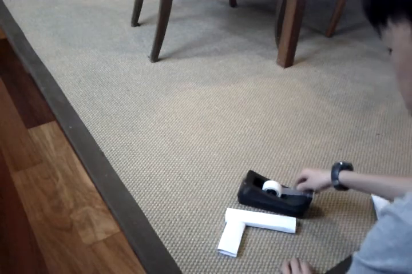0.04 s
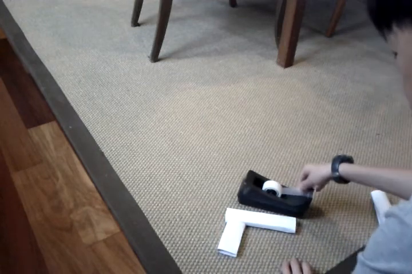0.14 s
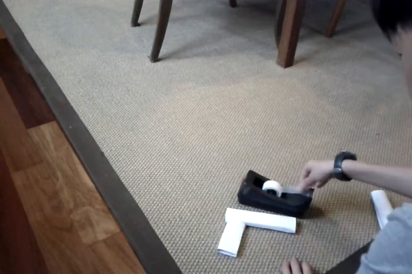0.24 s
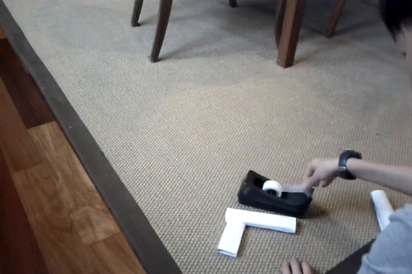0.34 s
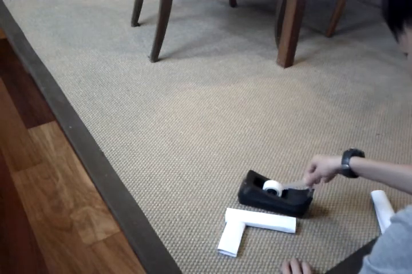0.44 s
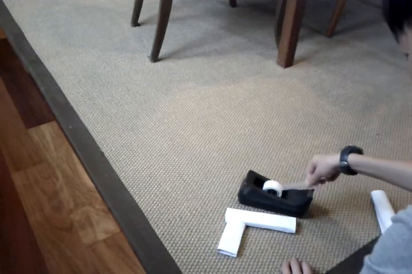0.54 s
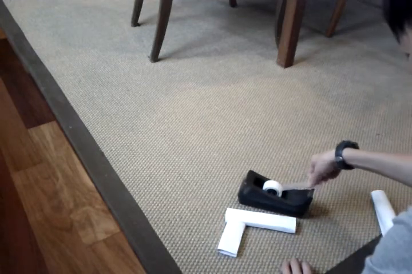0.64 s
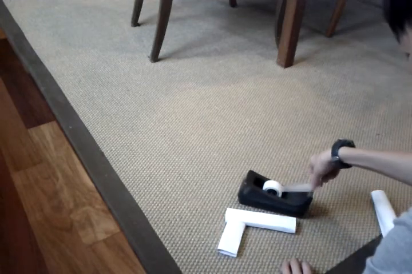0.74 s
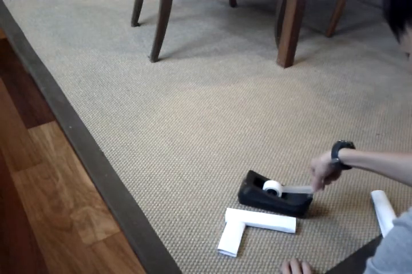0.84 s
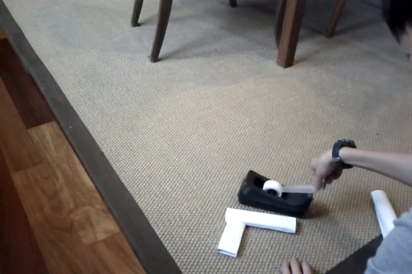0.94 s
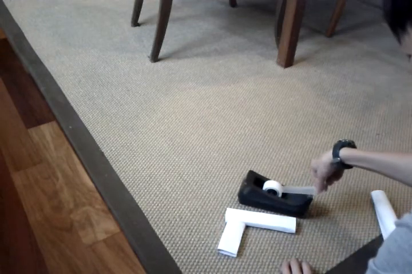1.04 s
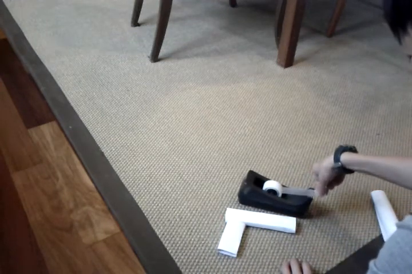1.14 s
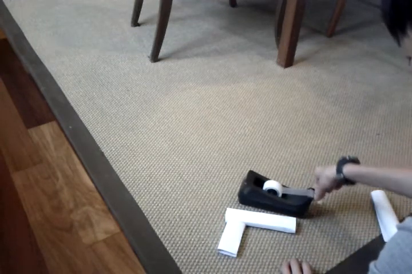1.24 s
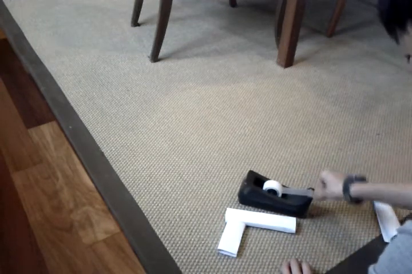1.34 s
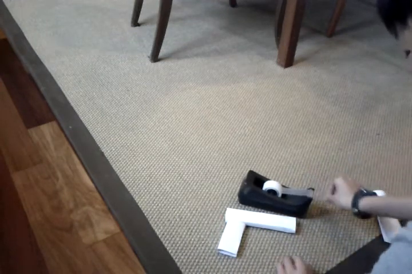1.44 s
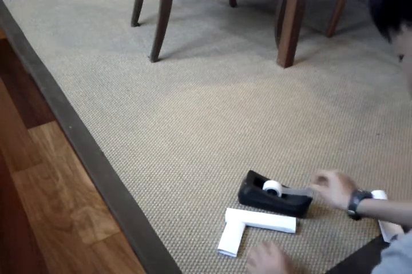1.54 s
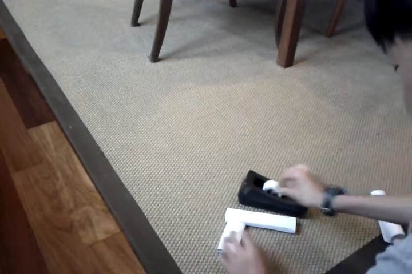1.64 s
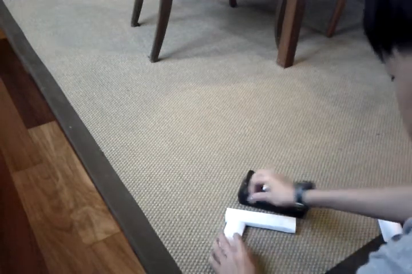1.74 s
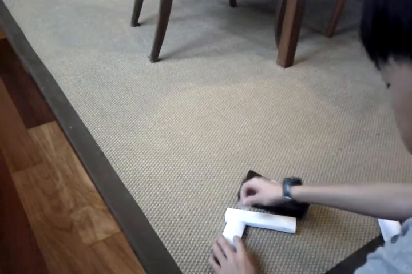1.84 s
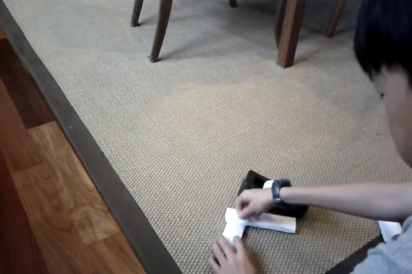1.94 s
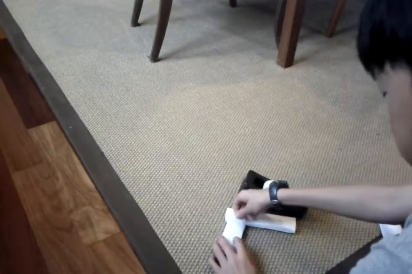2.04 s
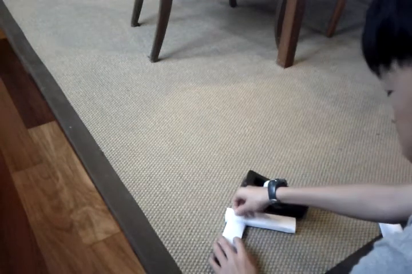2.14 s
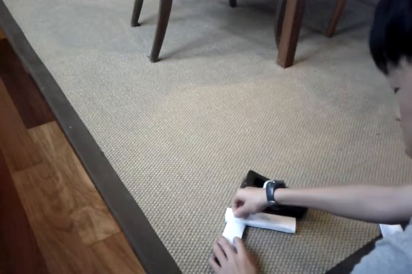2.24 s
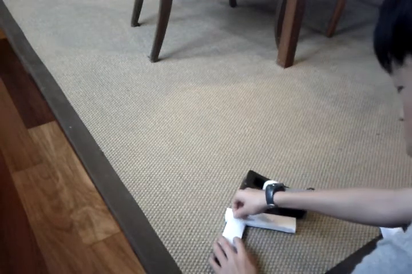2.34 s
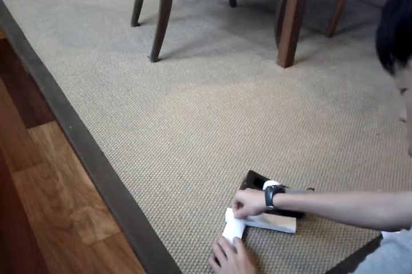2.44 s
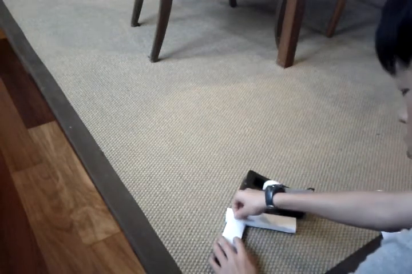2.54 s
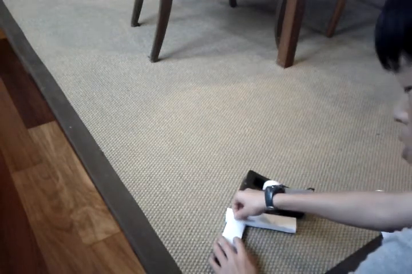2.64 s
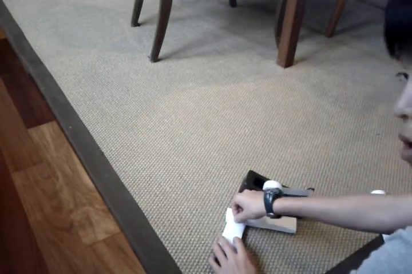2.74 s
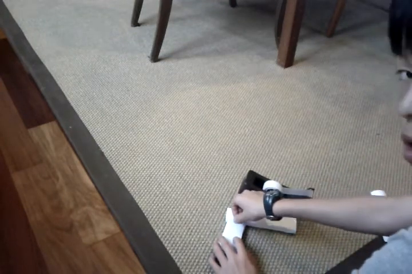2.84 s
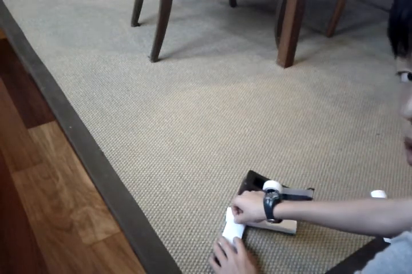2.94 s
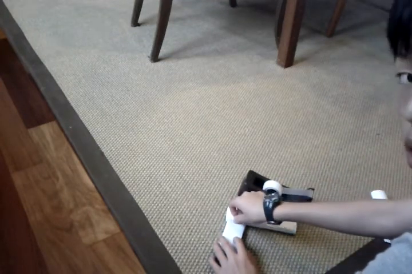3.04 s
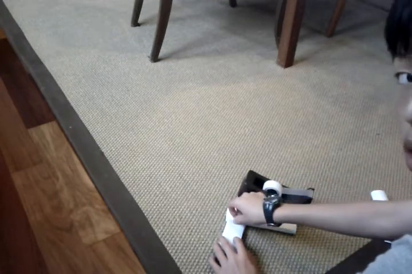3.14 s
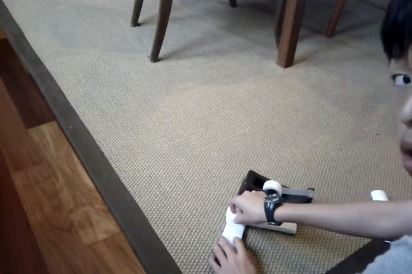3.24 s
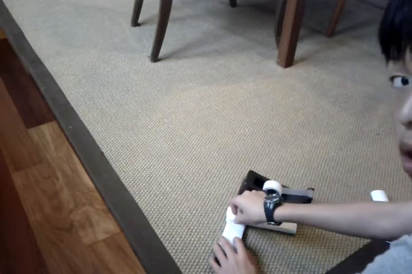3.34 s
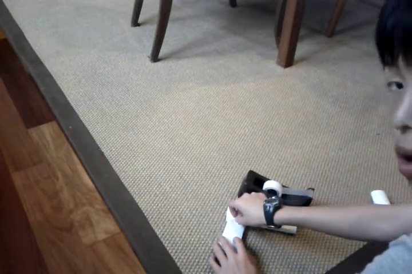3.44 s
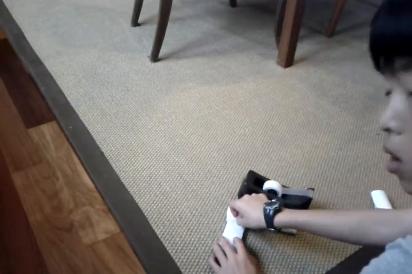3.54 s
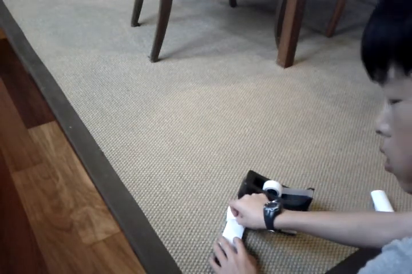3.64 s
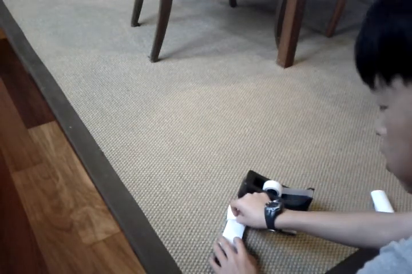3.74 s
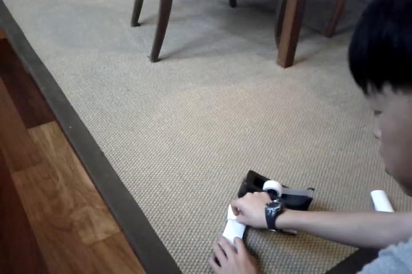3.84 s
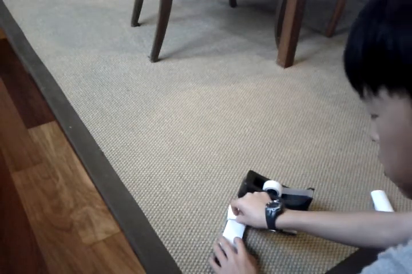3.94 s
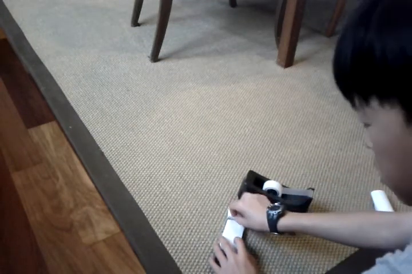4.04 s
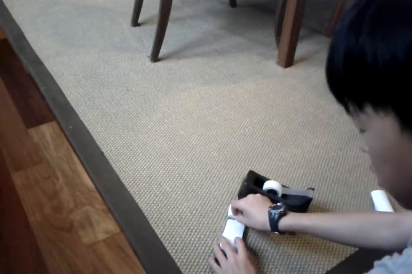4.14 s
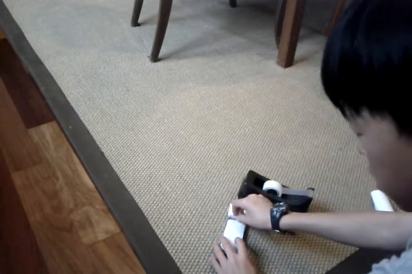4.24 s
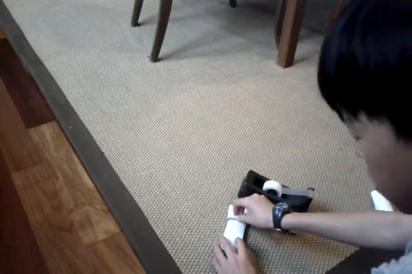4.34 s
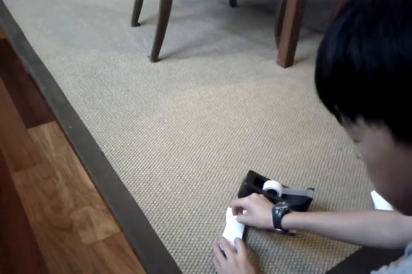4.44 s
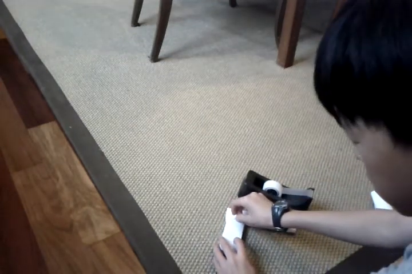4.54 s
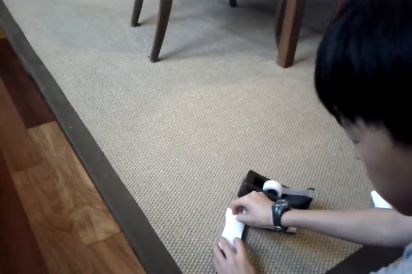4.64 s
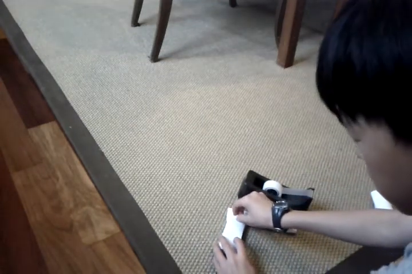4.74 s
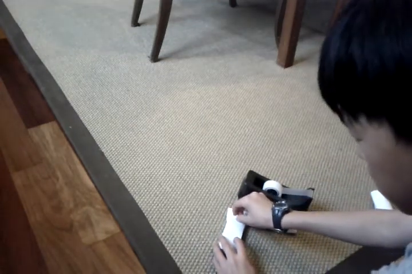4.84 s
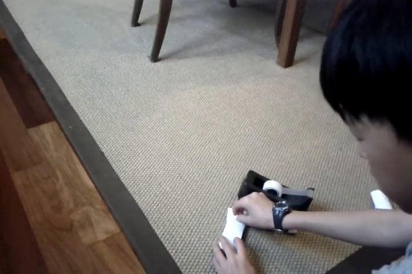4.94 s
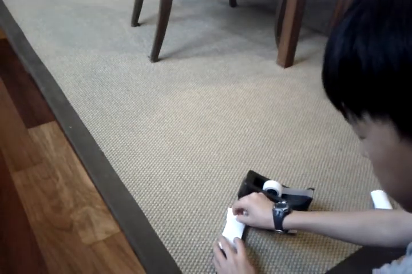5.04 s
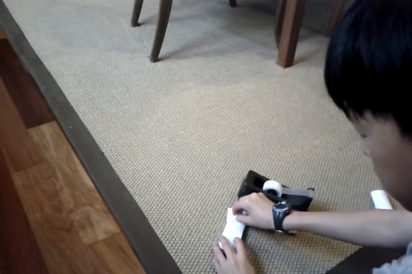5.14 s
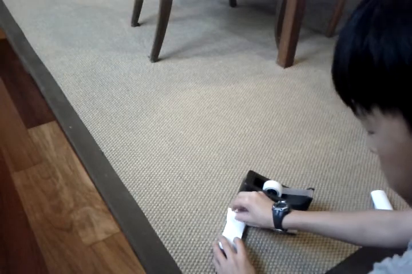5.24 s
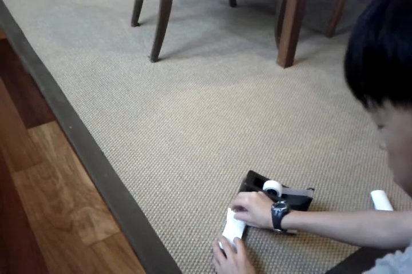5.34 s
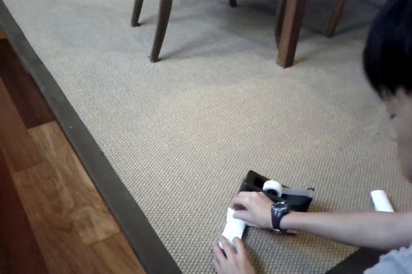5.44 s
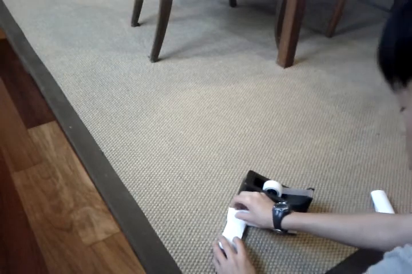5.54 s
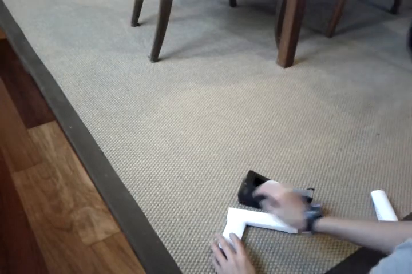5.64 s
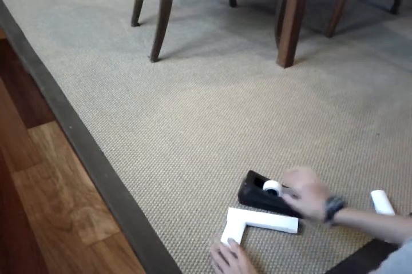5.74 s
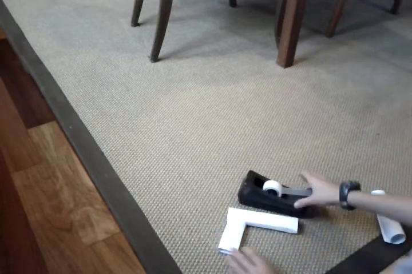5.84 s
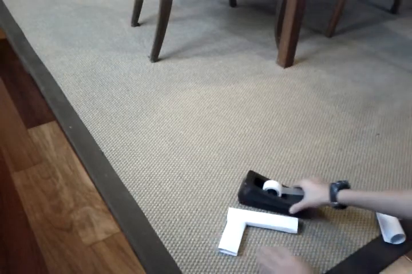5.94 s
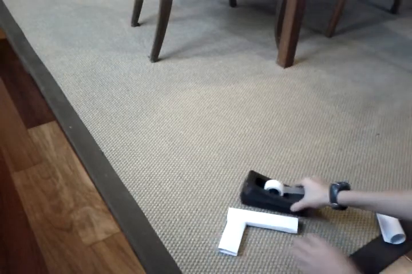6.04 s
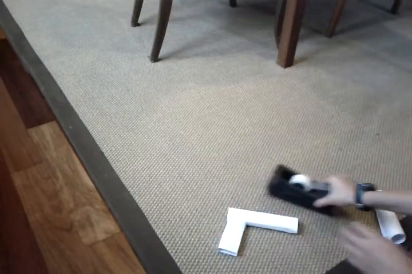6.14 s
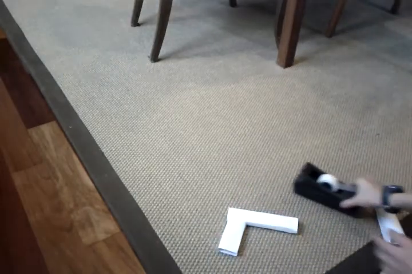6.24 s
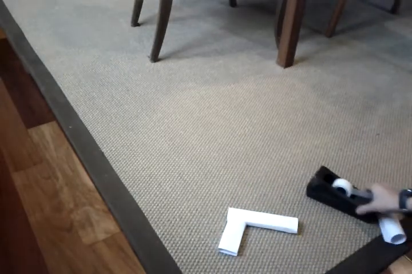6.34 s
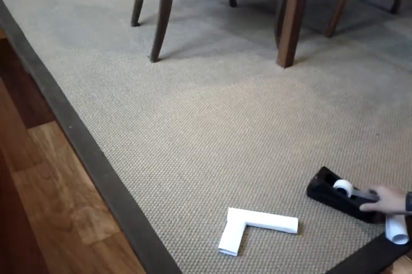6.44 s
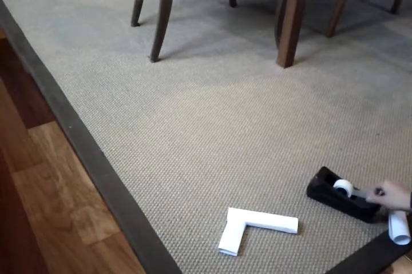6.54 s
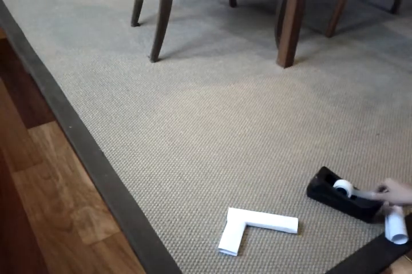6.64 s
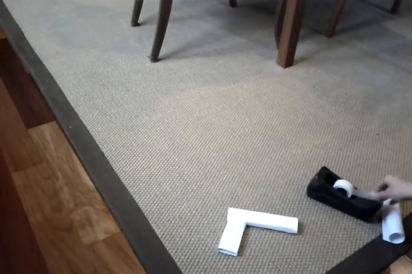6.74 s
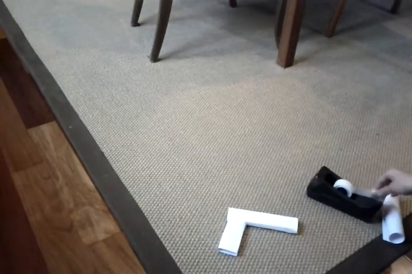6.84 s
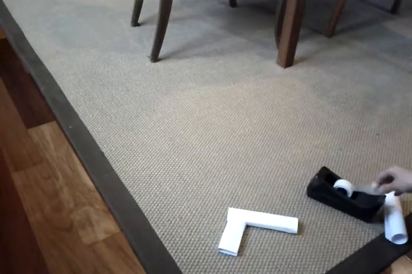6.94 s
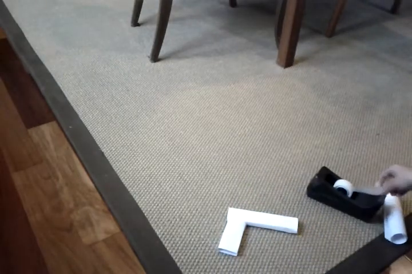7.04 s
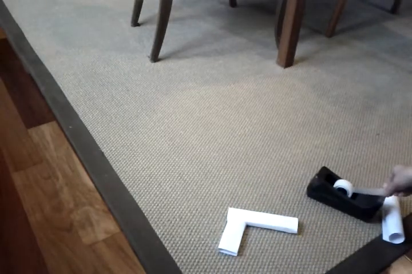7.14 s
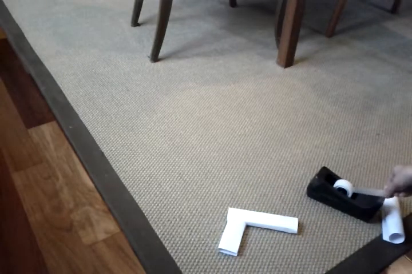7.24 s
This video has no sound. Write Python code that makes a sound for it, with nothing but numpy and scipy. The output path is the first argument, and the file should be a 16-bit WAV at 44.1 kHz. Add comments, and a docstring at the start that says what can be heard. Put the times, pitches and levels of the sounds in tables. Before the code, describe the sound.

Close, small-scale handling on a rug: irregular plastic knocks and tape ticks, a short zipping tear, a few tiny paper snaps, then mostly faint rubbing of skin and sleeve until one clearer paper snap. A grainy drag with a narrow rasp ends in a low cushioned thud. Bright tape plucks and a brief high squeak follow. The room adds a short live tail; the modest microphone lacks the highest treble and carries soft air noise.

```python
"""Tape dispenser on a rug

Sticky tape is drawn from a heavy plastic desk dispenser, ripped off on its toothed blade and pressed onto
paper tubes, which crackle; the dispenser is dragged aside, thumps down, and the tape end is plucked off.
Snaps are short bursts through resonances, rubbing is dense coloured grains, shell and floor ring in modes,
and the peeling blade squeaks in narrow noise. A quiet, fairly live room and a dull little microphone."""
import sys
import numpy as np
from scipy import signal
from scipy.fft import rfft, irfft
from scipy.io import wavfile
from scipy.ndimage import uniform_filter1d

SR = 44100
rng = np.random.default_rng(int(sys.argv[2]) if len(sys.argv) > 2 else 0)


def output_pcm(signal):
    """Save a mono or channel-first signal as 16-bit PCM at the path in sys.argv[1].

    Samples are clipped to [-1, 1] before scaling.
    """
    pcm = np.clip(np.atleast_2d(signal).T, -1, 1) * 32767
    wavfile.write(sys.argv[1], SR, np.round(pcm).astype(np.int16))


N = 321489
TIME = np.arange(N) / SR

# Room air and microphone hiss. Each row: frequency in Hz, relative level in dB.
AIR_COLOUR = [(15, -65.5), (25, -42), (47, -7.5), (80, -11.5), (148, -5.5), (174, -6.5), (196, -0.5),
              (364, -5), (409, -3.5), (627, -8), (723, -6.5), (1080, -10), (2250, -15.5), (6710, -17.5),
              (7200, -20), (9360, -83), (15800, -120)]
# A distant appliance's hum. Each row: frequency in Hz, level in dB.
HUM_TONES = [(145.3, -74.5), (204.6, -73.5), (414.5, -78.5), (473.7, -70.5), (705.2, -88.5), (1066, -76.5)]
# Soft landings of a hand and of the dispenser. Each row: time in seconds, level in dB.
THUMPS = [(.07, -64), (.16, -60), (1.915, -61), (5.275, -64.5), (6.472, -40), (6.478, -43)]
# The floor booming under the rug. Each row: frequency in Hz, relative level in dB, 60 dB decay in seconds.
FLOOR_MODES = [(58, -10, 0.58), (78, -7.5, 0.52), (104.2, 4, 0.16), (137, 0.5, 0.1), (182, 3.5, 0.088),
               (246, 3, 0.15)]
# A sleeve brushes the rug. Each row: greatest pressure in seconds, length in seconds, level in dB.
SLEEVE_STROKES = [(.15, 0.09, -63), (3.32, 0.18, -69), (4.06, 0.17, -64), (4.5, 0.54, -65),
                  (5.25, 0.32, -63.5), (5.68, 0.18, -55.5), (7.08, 0.13, -63)]
# Tone of the sleeve. Each row: frequency in Hz, relative level in dB.
SLEEVE_COLOUR = [(80, -15), (300, -1), (750, -1.5), (1200, 1.5), (2000, -13.5), (6000, -37)]
# Fingers rub over tape and paper. Each row: greatest pressure in seconds, length in seconds, level in dB.
FINGER_STROKES = [(.28, 0.5, -58), (1.8, 0.12, -61), (3.3, .5, -67), (4.09, .12, -57), (4.36, 0.4, -62.5),
                  (5.225, 0.068, -56.5), (5.615, 0.093, -58.5), (5.82, 0.17, -60), (7.1, 0.21, -56)]
# Tone of the fingers. Each row: frequency in Hz, relative level in dB.
FINGER_COLOUR = [(400, -2), (1600, 14.5), (3000, 10.5), (6500, 10), (8000, 6)]
# The spool shifts in its cradle and tape lets go of the roll and the blade. Each row: start in seconds,
# bright tick in dB, hollow knock in dB (both as energy spread over one ms), decay of the slips in ms.
DISPENSER_CONTACTS = [(.1891,-29.5,-45,2.3), (.2771,-43,-52.5,0.72), (.3203,-20,-35,.5),
                      (.3315,-32,-43,2.5), (0.354,-21,-22.5,1.6), (0.3676,-32,-49,11),
                      (.5314,-30.5,-38,4.6), (0.7726,-43.5,-53.5,1.3), (.8606,-26,-47,0.29),
                      (.8631,-26,-37.5,2.8), (.8749,-35.5,-45,2.2), (1.4172,-42,-69,0.83),
                      (6.258,-47,-58.5,1.3), (6.684,-50.5,-62,1.1)]
# Broad resonances of the shell's knock. Each row: frequency in Hz, width in Hz per pass, relative level in dB.
SHELL_BODY = [(596, 220, -8), (970, 190, -21), (1374, 310, 4), (1924, 1050, 2), (2490, 1100, -7)]
# The plastic shell's long ring. Each row: frequency in Hz, relative level in dB, 60 dB decay in seconds.
SHELL_MODES = [(985, -14, .32), (1451, -7, .35), (1570, -10, .3), (1734, -5, .35), (1821, 0, .42),
               (2218, -14, .35), (4474, -9, .28), (4567, -11, .28), (6406, -6, .22)]
# The strip's hollow note as it rips. Each row: frequency in Hz, width in Hz per pass, relative level in dB.
RIPPING_FILM = [(590, 700, -14.5), (945, 340, -8.5), (1470, 480, -2.5), (1840, 370, 6.5),
                (2630, 1340, -9.5)]
# Tape and paper tubes buckle under the fingers. Each row: start in seconds, bright tick in dB,
# hollow knock in dB (both as energy spread over one ms), decay of the slips in ms.
CREASES = [(1.675,-44.5,-50,6.2), (1.7546,-38,-64,8.3), (1.7738,-46,-63,4.3), (1.7801,-32.5,-56,1.2),
           (1.7852,-32.5,-53,1.3), (1.9153,-46.5,-57,9), (3.3121,-37,-46,1.7), (3.4716,-41.5,-50,0.56),
           (3.6375,-33.5,-37,1), (4.2975,-44,-45.5,1.3), (4.4333,-41.5,-41,0.78), (4.5464,-48.5,-49,3),
           (4.6023,-51.5,-56,0.62), (4.6664,-50.5,-46.5,2.2), (5.2335,-25.5,-30.5,0.92),
           (5.269,-40,-41,5.9)]
# Hollow note of the paper tubes. Each row: frequency in Hz, width in Hz per pass, relative level in dB.
TUBE_BODY = [(1240, 450, -1), (1640, 450, -6), (1850, 610, -5)]
# Tone of the dragged base. Each row: frequency in Hz, relative level in dB.
DRAG_COLOUR = [(100, 1.5), (300, 0.5), (1000, 3.5), (2200, 2), (3600, -2), (4500, -0.5), (6500, 4.5),
               (8000, -13.5)]
# The base scuffs the rug as it lands. One row: greatest pressure in seconds, length in seconds, level in dB.
LANDING_SCUFF = (6.49, 0.06, -59.5)
# The taut tape end snaps as it is picked off the blade. Each row: start in seconds, bright tick in dB,
# hollow knock in dB (both as energy spread over one ms), decay of the slips in ms.
PLUCKS = [(6.8669,-15.5,-31,0.48), (6.878,-41,-55,1.6), (6.8972,-19,-29,7.1), (6.9068,-20.5,-35.5,1.7),
          (6.9911,-30.5,-43.5,.7), (7.081,-41,-49,2.1), (7.1515,-32.5,-41.5,4.2)]
# Hollow note of the taut end. Each row: frequency in Hz, width in Hz per pass, relative level in dB.
PLUCKED_FILM = [(634, 470, -6.5), (1410, 530, 4.5), (2230, 1700, -2)]
# The thin steel blade's resonances. Each row: frequency in Hz, width in Hz per pass, relative level in dB.
BLADE = [(5080, 100, -1), (5390, 84, 2), (5360, 130, -2), (5420, 150, -6), (6740, 190, -3)]
# How long the room rings. Each row: frequency in Hz, 60 dB decay in seconds.
ROOM_T60 = [(200, .5), (1500, 0.49), (4000, 0.6), (7000, 0.6)]
# Tone of the room's tail. Each row: frequency in Hz, level in dB.
ROOM_COLOUR = [(100, 8), (500, -2), (1500, -0.5), (2800, -2.5), (4500, -2), (6500, -11.5), (8000, -2)]
# Near surfaces. Each row: delay in ms, level in dB.
ECHOES = [(1.15, -21), (3.5, -8.5), (11.2, -12.5)]

AIR_DB = -58
CUTOFF_HZ = 7450   # reference for the microphone's top end
# the sheet's flex follows a blend of tick and knock levels, set some dB lower: share of the knock
FLEX_FOLLOWS_KNOCK = 0.24
CRISP_HZ_PER_DB = 23   # the more the tick outweighs the knock, the higher it sounds
STROKE_RISE_SHARE = 0.33   # of a stroke's length
# the blade's teeth burst through the tape one after another
TEAR_PEAK_S, TOOTH_GAP_MS, TOOTH_JITTER_MS, POP_MS = 1.4428, 2.3, 0.3, 2
TEAR_TICK_DB, TEAR_KNOCK_DB = -17.5, -23   # at the height of the tear
KNOCK_LAG_MS = 3.5   # the hollow note comes late, as the strip slackens
TEAR_RISE_DB_PER_MS, TEAR_FALL_DB_PER_MS = 2.5, 0.95
SPRING_BACK_DB = -38   # the blow to the shell as the tape parts
DRAG_START_S, DRAG_STOP_S, DRAG_DB = 6.07, 6.48, -56
# the first shove zips across the weave, higher as it goes faster
SHOVE_S, SHOVE_HALF_LENGTH_S, ZIP_DB = 6.165, 0.07, -62
ZIP_SLOW_HZ, ZIP_FAST_HZ, ZIP_WIDTH_HZ = 4400, 5500, 450
# the tape end peels off and bows the blade
PEEL_START_S, PEEL_STOP_S, PEEL_DB = 6.896, 6.946, -31


def from_db(db):
    """Turns decibels into a gain."""
    return 10 ** (np.asarray(db) / 20)


def rms_one(x):
    """Brings a sound to unit rms."""
    return x / np.sqrt(np.mean(x ** 2) + 1e-20)


def at_hz(points, hz):
    """Reads a table on a log-frequency axis."""
    freqs, values = np.transpose(points)
    return np.interp(np.log(hz + 1e-3), np.log(freqs), values)


def add(out, s, sound):
    """Mixes a sound in at time s."""
    start = max(0, round(s * SR))
    out[start:start + len(sound)] += sound[:N - start]


def coloured(x, colour):
    """Gives x a spectrum, at unit rms."""
    gain = from_db(at_hz(colour, np.fft.rfftfreq(len(x), 1 / SR)))
    return rms_one(irfft(rfft(x) * gain, len(x)))


def unevenness(per_s, depth_db):
    """A gain near one that wanders between random points, per_s of them a second."""
    knots = rng.standard_normal(1000)
    return from_db(depth_db * np.interp(TIME * per_s, np.arange(len(knots)), knots))


def background():
    """Steady air and hiss, with a faint hum that wavers slightly in pitch and level."""
    out = from_db(AIR_DB) * coloured(rng.standard_normal(N), AIR_COLOUR)
    for hz, db in HUM_TONES:
        wandering_hz = hz * unevenness(per_s=9, depth_db=0.02)   # about a quarter of a percent
        tone = np.sqrt(2) * np.sin(2 * np.pi * np.cumsum(wandering_hz) / SR)
        out += from_db(db) * unevenness(per_s=7, depth_db=1.0) * tone
    return out


def ring(blows, modes, spread_db):
    """Each blow (s, dB) sets all modes ringing within half a cycle, each with a strength of its own."""
    out, t = np.zeros(N), TIME[:SR // 2]
    hz, mode_db, t60 = np.transpose(modes)
    cycles = hz[:, None] * t
    onset = np.minimum(2 * cycles, 1)
    waves = np.sin(2 * np.pi * cycles) * onset * from_db(-60 * t / t60[:, None])
    for s, db in blows:
        strength_db = db + mode_db + spread_db * rng.standard_normal(len(hz))
        add(out, s, from_db(strength_db) @ waves)
    return out


def landing():
    """The rug cushions each landing, and the floor booms softly without deep bass."""
    no_rumble = signal.butter(4, 52, "high", fs=SR, output="sos")
    return signal.sosfilt(no_rumble, ring(THUMPS, FLOOR_MODES, spread_db=1.0))


def strokes(rows):
    """A gain that swells and fades with each stroke, rising faster than it falls."""
    out = np.zeros(N)
    for s, length_s, db in rows:
        side_share = np.where(TIME < s, STROKE_RISE_SHARE, 1 - STROKE_RISE_SHARE)
        reach = (TIME - s) / (length_s * side_share)
        out += from_db(db) * np.exp(-np.minimum(reach ** 2, 20))
    return out


def friction(colour, grains_per_s, size_db):
    """Fibres catch and let go: dense grains of uneven size."""
    sizes = from_db(size_db * np.minimum(rng.exponential(1, N), 4))
    caught = rng.random(N) < grains_per_s / SR
    return coloured(sizes * rng.standard_normal(N) * caught, colour)


def sleeve():
    """Cloth brushes the rug: fine, dark grains swelling with each stroke."""
    return strokes(SLEEVE_STROKES) * friction(SLEEVE_COLOUR, grains_per_s=4000, size_db=2.0)


def fingers():
    """Skin rubs over tape and paper: sparser, bright grains under wandering pressure."""
    pressure = strokes(FINGER_STROKES) * unevenness(per_s=35, depth_db=3.0)
    return pressure * friction(FINGER_COLOUR, grains_per_s=1800, size_db=2.0)


def resonate(x, hz, width_hz):
    """A broad resonance with gain 1 on top."""
    r = np.exp(-np.pi * width_hz / SR)
    zeros = np.array([1, 0, -1]) * (1 - r * r) / 2
    poles = [1, -2 * r * np.cos(2 * np.pi * hz / SR), r * r]
    return signal.lfilter(zeros, poles, x)


def hump(x, hz, width_hz):
    """Two passes through one resonance, for steep skirts."""
    return resonate(resonate(x, hz, width_hz), hz, width_hz)


def contacts(rows, body, base_tick_hz, tick_width_hz, flex_hz, flex_width_hz, flex_offset_db, grit):
    """A sudden release and a dying spray of tiny slips excite a bright tick, a flexing sheet and a hollow body."""
    out, t = np.zeros(N), TIME[:SR // 20]
    one_ms = np.sqrt(SR / 1000 / len(t))   # gives each burst the energy of one ms at its level
    soften = signal.butter(6, CUTOFF_HZ - 300, fs=SR, output="sos")
    for s, tick_db, knock_db, decay_ms in rows:
        tick_hz = base_tick_hz + CRISP_HZ_PER_DB * (tick_db - knock_db)
        flex_db = tick_db + FLEX_FOLLOWS_KNOCK * (knock_db - tick_db) + flex_offset_db
        force = grit * rng.standard_normal(len(t)) * np.exp(-1000 * t / decay_ms)
        force[0] += 1   # the release itself
        tick = signal.sosfilt(soften, hump(force, tick_hz, tick_width_hz))
        flex = hump(force, flex_hz, flex_width_hz)
        # neighbouring resonances swing in opposite directions
        knock = sum((-1) ** k * from_db(db) * hump(force, hz, width) for k, (hz, width, db) in enumerate(body))
        sound = from_db(tick_db) * rms_one(tick) - from_db(flex_db) * rms_one(flex)
        sound += from_db(knock_db) * rms_one(knock)
        add(out, s, one_ms * sound)
    return out


def dispenser():
    """Clicks of spool and tape in the plastic cradle."""
    return contacts(DISPENSER_CONTACTS, SHELL_BODY, base_tick_hz=5960, tick_width_hz=2350,
                    flex_hz=3590, flex_width_hz=1720, flex_offset_db=-4.0, grit=0.26)


def shell():
    """Every dispenser knock leaves the plastic shell ringing; it springs back hardest when the tape parts."""
    knocks = [(s, knock_db - 28.5) for s, _, knock_db, _ in DISPENSER_CONTACTS]
    parting = (TEAR_PEAK_S + KNOCK_LAG_MS / 1000, SPRING_BACK_DB)
    return ring(knocks + [parting], SHELL_MODES, spread_db=2.5)


def tooth_db(ms):
    """How much weaker a tooth pops before or after the height of the tear."""
    return min(TEAR_RISE_DB_PER_MS * ms, -TEAR_FALL_DB_PER_MS * ms)


def tear():
    """A quick, slightly uneven run of pops along the blade swells, then eases as the last strands part."""
    teeth_ms = TOOTH_GAP_MS * np.arange(-4, 9)
    teeth_ms = teeth_ms + TOOTH_JITTER_MS * rng.standard_normal(len(teeth_ms))
    pops = []
    for ms in teeth_ms:
        tick_db = TEAR_TICK_DB + tooth_db(ms)
        knock_db = TEAR_KNOCK_DB + tooth_db(ms - KNOCK_LAG_MS)
        pops.append((TEAR_PEAK_S + ms / 1000, tick_db, knock_db, POP_MS))
    return contacts(pops, RIPPING_FILM, base_tick_hz=5500, tick_width_hz=3200,
                    flex_hz=3180, flex_width_hz=1380, flex_offset_db=-4.0, grit=0.26)


def paper():
    """Creases snap in the hollow tubes."""
    return contacts(CREASES, TUBE_BODY, base_tick_hz=6000, tick_width_hz=2170,
                    flex_hz=3450, flex_width_hz=1800, flex_offset_db=-7.0, grit=0.16)


def held(start_s, stop_s, attack_s, drift_db_per_s, release_db_per_s):
    """A gain that rises, then drifts steadily down or up while held, and dies away after the stop."""
    attack = np.clip((TIME - start_s) / attack_s, 0, 1)
    drift_db = drift_db_per_s * np.maximum(TIME - start_s - attack_s, 0)
    release_db = release_db_per_s * np.maximum(TIME - stop_s, 0)
    return attack * from_db(drift_db - release_db)


def drag():
    """The dispenser's base slides over the rug at a nearly even level and scuffs it as it lands."""
    slide = held(DRAG_START_S, DRAG_STOP_S, attack_s=0.094, drift_db_per_s=2.0, release_db_per_s=61)
    pressure = from_db(DRAG_DB) * slide + strokes([LANDING_SCUFF])
    grains = friction(DRAG_COLOUR, grains_per_s=10000, size_db=-0.5)
    return pressure * unevenness(per_s=130, depth_db=1.5) * grains


def weave_zip():
    """The rug's ribs pass under the base: a narrow rasp that rises and falls with the speed of the shove."""
    moving = np.exp(-np.minimum(((TIME - SHOVE_S) / SHOVE_HALF_LENGTH_S) ** 2, 20))
    hz = ZIP_SLOW_HZ + (ZIP_FAST_HZ - ZIP_SLOW_HZ) * moving ** 4
    slow_band = signal.butter(2, ZIP_WIDTH_HZ / 2, fs=SR, output="sos")
    irregular = signal.sosfilt(slow_band, rng.standard_normal(N))
    rasp = irregular * np.sin(2 * np.pi * np.cumsum(hz) / SR)
    return from_db(ZIP_DB) * moving * rms_one(rasp)


def plucks():
    """The taut tape end snaps off the blade in bright ticks with a thin, hollow film note."""
    return contacts(PLUCKS, PLUCKED_FILM, base_tick_hz=5750, tick_width_hz=2600,
                    flex_hz=3760, flex_width_hz=1200, flex_offset_db=-4.0, grit=0.18)


def squeak():
    """Rapid slips of the glue keep the blade's resonances singing while the tape peels."""
    slips = rng.standard_normal(N)
    song = sum(from_db(db) * rms_one(hump(slips, hz, width)) for hz, width, db in BLADE)
    # an even pull: level smoothed over 10 ms
    steady = song / np.sqrt(uniform_filter1d(song ** 2, SR // 100) + 1e-9)
    peel = held(PEEL_START_S, PEEL_STOP_S, attack_s=0.012, drift_db_per_s=-213, release_db_per_s=252)
    return from_db(PEEL_DB) * steady * peel


def room(x, build_s):
    """A diffuse tail that builds up as sound returns from the walls and dies band by band."""
    t, edges = TIME[:SR], np.geomspace(80, 9000, 13)
    white, tail = rng.standard_normal((2, len(t))), 0
    for k, (low, high) in enumerate(zip(edges, edges[1:])):
        hz = np.sqrt(low * high)
        band_filter = signal.butter(2, [low, high], "band", fs=SR, output="sos")
        band = signal.sosfilt(band_filter, white[k % 2])   # neighbouring bands use separate noise
        decay = from_db(-60 * t / at_hz(ROOM_T60, hz)) * (1 - np.exp(-t / build_s))
        tail = tail + from_db(at_hz(ROOM_COLOUR, hz)) * band * decay / np.linalg.norm(decay)
    return signal.fftconvolve(x, tail)[:N]


def scene():
    """The handling sounds with their near echoes and room tail, over the steady background."""
    thump, plastic, rip, creases, snaps = landing(), dispenser(), tear(), paper(), plucks()
    ringing = shell() + squeak()
    rubbing = sleeve() + fingers() + drag() + weave_zip()
    direct = thump + plastic + rip + creases + snaps
    out = direct + ringing + rubbing + background()
    for delay_ms, db in ECHOES:
        add(out, delay_ms / 1000, from_db(db) * direct)
    # each source faces the walls differently
    to_walls = from_db(-1.5) * plastic + from_db(-1.5) * rip + from_db(-3.0) * snaps + from_db(-3.5) * creases
    to_walls += from_db(-9.5) * thump + from_db(-14.5) * ringing
    return (out + room(to_walls, build_s=0.0015))[None]


def record(dry):
    """The microphone rounds off, then cuts steeply, everything above the mid treble."""
    rounded = signal.sosfilt(signal.butter(10, CUTOFF_HZ - 100, fs=SR, output="sos"), dry)
    return signal.sosfilt(signal.cheby1(14, 0.1, CUTOFF_HZ - 50, fs=SR, output="sos"), rounded)


dry = scene()
out = record(dry)
output_pcm(out)
```